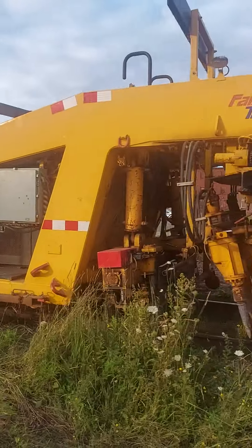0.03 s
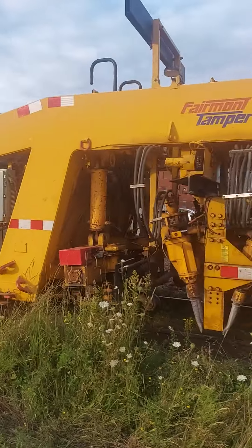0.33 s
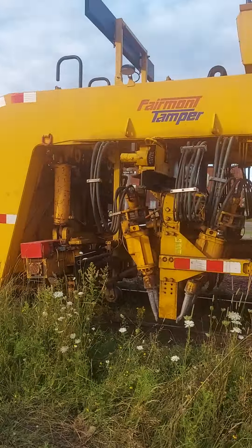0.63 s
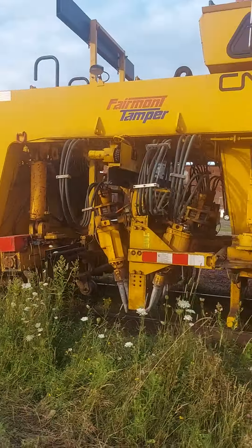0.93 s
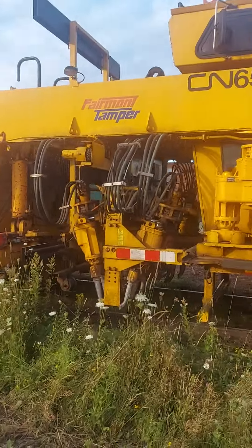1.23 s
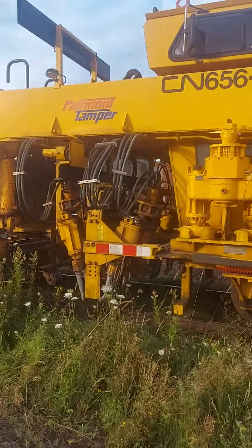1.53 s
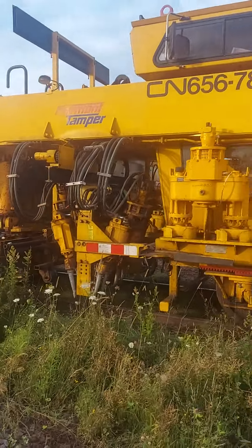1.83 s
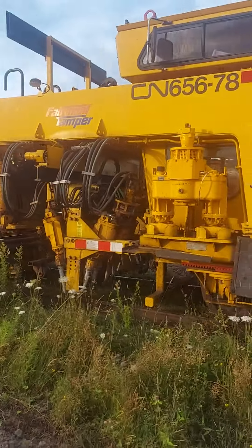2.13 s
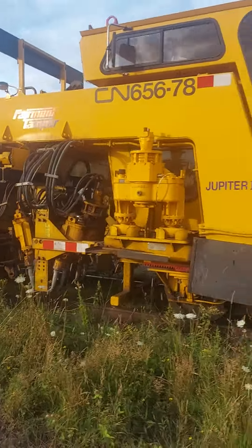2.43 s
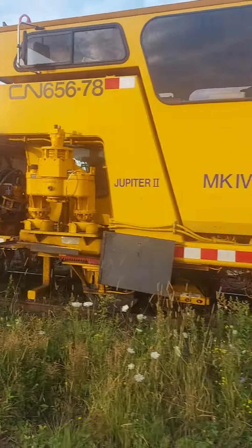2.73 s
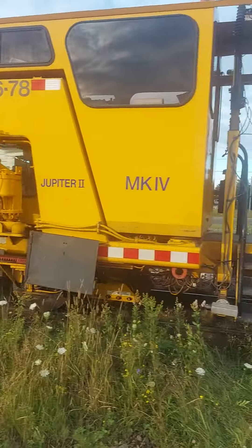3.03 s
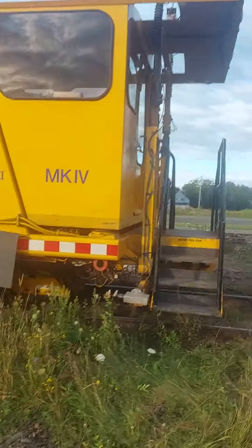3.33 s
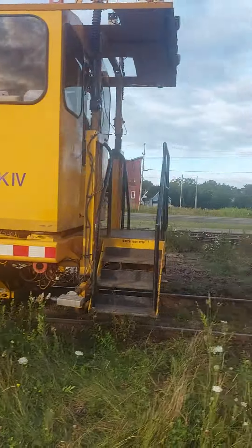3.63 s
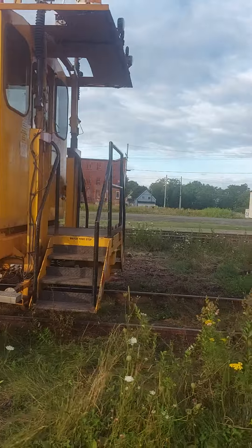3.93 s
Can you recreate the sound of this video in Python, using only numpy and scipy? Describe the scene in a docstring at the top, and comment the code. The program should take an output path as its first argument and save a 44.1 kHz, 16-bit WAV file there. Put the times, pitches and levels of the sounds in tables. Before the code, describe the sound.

Low wind rumble buffets a muffled handheld microphone outdoors. Dull handling knocks and soft footsteps in grass come through over a faint distant wash and hum, and one strong gust thumps near the end.

```python
"""First comes a low rumble of air on a camera's two muffled microphone ports, over a far wash, a hum
and faint hiss. Dull handling knocks ring briefly in the case as someone carries it through grass,
past a silent, parked rail machine. The soft footsteps and the distance reach mostly the left port.
Moving air rumbles and thumps on each port by itself, with one strong gust near the end."""
import sys
import numpy as np
from scipy.fft import rfft, irfft, next_fast_len
from scipy.io import wavfile
from scipy.ndimage import map_coordinates

SR = 44100
rng = np.random.default_rng(int(sys.argv[2]) if len(sys.argv) > 2 else 0)


def wav_out(sig):
    """Save sig, one row per channel (or a flat mono array), as 16-bit PCM at SR to the path in sys.argv[1]."""
    wavfile.write(sys.argv[1], SR, np.round(np.clip(np.atleast_2d(sig).T, -1, 1) * 32767).astype(np.int16))


N = 176400


def amp(db):
    """Decibels to gain."""
    return 10 ** (np.asarray(db) / 20)


def unit(x):
    """Scale to rms 1."""
    return x / np.sqrt(np.mean(x ** 2) + 1e-20)


def noise():
    """White noise."""
    return rng.standard_normal(N)


def curve(rows):
    """(t/s, value) points as one value per sample."""
    return np.interp(np.arange(N) / SR, *np.transpose(rows))


def wobble(rate):
    """A smooth random curve, rate knots a second."""
    return map_coordinates(rng.standard_normal(int(N * rate / SR) + 4), [np.arange(N) * rate / SR])


def swell(centre, half_s):
    """A bell-shaped rise and fall."""
    return np.exp(-((np.arange(N) / SR - centre) / half_s) ** 2)


def bursts(rows, t60_s, rise_s=0.002):
    """Envelope of (t/s, level/dB) events that rise quickly and die away."""
    ages = [(np.maximum(np.arange(N) / SR - t, 0), db) for t, db in rows]
    return sum((1 - np.exp(-(age / rise_s) ** 2)) * amp(db - 60 * age / t60_s) for age, db in ages)


def filtered(x, response):
    """x through a complex response of frequency."""
    size = next_fast_len(N + 8192)
    return irfft(rfft(x, size) * response(np.fft.rfftfreq(size, 1 / SR)), size)[..., :N]


def coloured(x, spectrum):
    """x shaped by (f/Hz, relative level/dB) points, at rms 1."""
    hz, db = np.transpose(spectrum)
    return unit(filtered(x, lambda f: amp(np.interp(np.log(f + 1), np.log(hz), db))))


def lowpass(f, edge_hz):
    """Response of a causal third-order low-pass."""
    s = 1j * f / edge_hz
    return 1 / ((1 + s) * (1 + s + s * s))


def ring(f, modes, alternate):
    """Response of damped modes, in like or alternating polarity."""
    return sum((-1) ** (k * alternate) * amp(db) * 1j * f * width / (hz * hz - f * f + 1j * f * width)
               for k, (hz, width, db) in enumerate(modes))


# Air flow right on each microphone port: t/s, level/dB
FLOW_LEFT = [(0.0, -46), (0.62, -52), (0.76, -55), (0.88, -49), (0.94, -51.3), (1.46, -47), (1.48, -42.5),
             (1.74, -52.5), (1.8, -49), (2.02, -53.5), (2.12, -47.5), (2.32, -52), (2.44, -51),
             (2.6, -41.5), (2.78, -41.5), (2.84, -44.5), (3.04, -55), (3.06, -39), (3.26, -24.5),
             (3.36, -24.5), (3.42, -39.5), (3.52, -35.5), (3.56, -50.5), (3.68, -40), (3.76, -48.5),
             (4.0, -42)]
FLOW_RIGHT = [(0.0, -82), (0.02, -55), (0.36, -66), (0.57, -53.5), (0.72, -73), (1.34, -54.5),
              (1.46, -63.8), (2.0, -59), (2.16, -65.3), (2.34, -49.5), (2.42, -67.5), (2.64, -47),
              (2.7, -59), (2.9, -42), (2.98, -76), (3.18, -65.5), (3.32, -48), (3.44, -39), (3.56, -66),
              (4.0, -58.5)]
# Colour of the breeze on each port, and of a gust: f/Hz, relative level/dB
BREEZE_LEFT = [(20, -23.5), (32, -16), (45, -4.5), (65, 2.5), (95, -1), (135, -2), (170, -11), (225, -15),
               (290, -18.5), (370, -30.5), (480, -54.5), (2000, -100)]
BREEZE_RIGHT = [(20, -11), (32, -5.5), (55, 4.5), (80, 0.5), (130, -7), (220, -25.5), (310, -26.5),
                (450, -38.5), (1500, -69)]
GUST = [(20, -38), (32, -28), (50, -18), (90, 5.5), (160, 0), (250, -8.5), (340, -17), (430, -45),
        (1500, -100)]


def air_rumble(flow, breeze, lumps_db, gust_onset_db=-37, gust_range_db=22):
    """Moving air buffets one port: a lumpy rumble, brighter in a strong gust."""
    flow_db, eddies = curve(flow), noise()
    gust = np.clip((flow_db - gust_onset_db) / gust_range_db, 0, 1)
    rumble = (1 - gust) * coloured(eddies, breeze) + gust * coloured(eddies, GUST)
    return amp(flow_db) * unit(rumble * amp(lumps_db * wobble(21.715)))


# Wash from far off, at the left port: t/s, low band level/dB, high band level/dB
WASH = [(0, -65, -67), (.25, -70, -72.5), (.65, -64.5, -65), (.95, -70.5, -76), (1.35, -63, -78.5),
        (1.85, -67.5, -76.5), (2.1, -64.5, -74.5), (2.4, -63, -66.5), (3.2, -62, -61.5), (3.55, -58.5, -66),
        (3.75, -65.5, -69), (4, -65, -68)]
# Colour of its two bands: f/Hz, relative level/dB
WASH_LOW = [(100, -11), (280, 2), (470, 1), (760, -0.5), (950, -12), (1300, -19), (2000, -36.5),
            (4000, -66.5)]
WASH_HIGH = [(400, -21), (800, -6), (1000, -1.5), (1200, -2), (1420, -10), (1700, -19.5), (2200, -31.5),
             (4000, -62)]


def far_wash():
    """A hollow wash, like far traffic: two bands of noise swell and fade."""
    t, low_db, high_db = np.transpose(WASH)
    low = amp(curve(np.c_[t, low_db])) * coloured(noise(), WASH_LOW)
    high = amp(curve(np.c_[t, high_db])) * coloured(noise(), WASH_HIGH)
    return low + high


# Distant engine, at the left port: f/Hz, level/dB, loudest at t/s, half length/s
HUM = [(64.7, -60.5, 0.72, 4.6), (121.3, -60.5, 1.3, 2), (176.3, -62, 1.9, 0.46),
       (194.7, -58.5, 0.035, 0.67), (225, -61, 1.4, 0.33), (230.3, -67, 2.1, 0.99)]


def engine_hum(waver=0.0093):
    """A distant engine hums in low tones, each wavering in pitch and swelling by itself."""
    hum = np.zeros(N)
    for hz, db, centre, half_s in HUM:
        pitch_hz = hz * (1 + waver * wobble(8.7))
        tone = np.sqrt(2) * np.sin(2 * np.pi * np.cumsum(pitch_hz) / SR)
        hum += amp(db) * swell(centre, half_s) * tone
    return hum


# Noise floor of the microphones, ahead of each side's gain: t/s, level/dB
HISS = [(0.0, -79.5), (0.14, -82.5), (2.49, -82.5), (2.65, -80.5), (2.99, -82.5), (3.31, -78.5),
        (3.66, -83), (4.0, -81.5)]
# Its colour in each microphone: f/Hz, relative level/dB
HISS_LEFT = [(100, -6), (2000, -5), (3000, -9.5), (4200, -11), (6500, -15.5), (9000, -10.5), (11000, -1.5),
             (13500, -0.5), (15700, -5)]
HISS_RIGHT = [(100, 11), (700, 4.5), (1500, 0), (3000, -4), (4200, -3.5), (6800, -9), (9000, -5),
              (11000, 1), (13500, 1), (15700, -7.5)]


def microphone_hiss(left_db=6.5, right_db=3):
    """Each microphone adds its own faint hiss."""
    left = amp(left_db) * coloured(noise(), HISS_LEFT)
    right = amp(right_db) * coloured(noise(), HISS_RIGHT)
    return amp(curve(HISS)) * np.array([left, right])


# Case modes at each port: f/Hz, width/Hz, relative level/dB
CASE_LEFT = [(347, 135, 17), (659.4, 236, 31.5), (1042, 213, 35.5)]
CASE_RIGHT = [(104, 79, 3.3), (338.3, 78, 16.9), (783, 280, 5), (1037, 520, 1)]
# Handling knocks on the case, right at the microphones: t/s, relative level/dB
KNOCKS = [(0.0544, -15), (1.2046, 0), (1.7534, -3.6), (2.3199, -1), (2.499, -17), (2.792, -13),
          (2.9184, -6), (3.3539, 3.5), (3.677, -17.5), (3.9669, -18)]


def case_knocks(click_db=-38):
    """Each knock pushes the case once, with a faint contact click; the ports hear different modes."""
    blows = np.zeros(N)
    for t, db in KNOCKS:
        blows[round(t * SR)] = -amp(db)
    # The case passes little treble.
    left = filtered(blows, lambda f: ring(f, CASE_LEFT, alternate=True) * lowpass(f, edge_hz=332.4))
    right = filtered(blows, lambda f: ring(f, CASE_RIGHT, alternate=False) * lowpass(f, edge_hz=547))
    click = amp(click_db) * filtered(blows, lambda f: lowpass(f, edge_hz=2780) ** 2)
    return np.array([left + click, right + click])


# After-sound of a knock, at both ports: f/Hz, relative level/dB
TAIL_COLOUR = [(200, -10), (350, -2), (600, -3), (1150, -0.5), (1700, -6), (2500, -15.5), (6000, -48)]


def knock_tails(gain_db=-66, right_db=-7):
    """A faint, diffuse after-sound follows each knock."""
    left = coloured(noise(), TAIL_COLOUR)
    right = amp(right_db) * coloured(noise(), TAIL_COLOUR)
    return amp(gain_db) * bursts(KNOCKS, t60_s=0.36) * np.array([left, right])


# Eddies straight onto the ports: t/s, f/Hz, left peak level/dB, right peak level/dB
THUMPS = [(.465, 112, -37.5, -66), (0.544, 81.4, -44, -44.5), (.885, 80, -38, -73),
          (1.048, 68.6, -35.5, -74), (1.244, 77, -43.5, -35), (1.333, 131, -66, -49), (1.52, 131, -34, -65),
          (2.631, 121, -35, -40), (2.663, 82, -28.5, -62), (3.095, 152, -22.5, -65), (3.092, 270, -29, -70),
          (3.137, 180, -28, -70.5), (3.259, 100, -16, -60), (3.272, 210, -19, -66), (3.306, 310, -19, -61),
          (3.335, 118.7, -16, -50), (3.511, 81, -24.5, -60)]


def air_thumps(half_cycles=0.93):
    """Single eddies hit the ports as low pushes of a cycle or two."""
    ports = np.zeros((2, N))
    for t, hz, left_db, right_db in THUMPS:
        cycles = (np.arange(N) / SR - t) * hz
        push = np.cos(2 * np.pi * cycles) * np.exp(-(cycles / half_cycles) ** 2)
        ports += amp([[left_db], [right_db]]) * push
    return ports


# Steps in the grass below the camera: t/s, tread level/dB, swish level/dB, swish lag/s
STEPS = [(0.483, -52.5, -72.5, 0.044), (1.05, -58.5, -83, 0.013), (1.606, -55.5, -77.5, 0.019),
         (2.172, -56.5, -83, 0.042), (2.744, -55, -69, 0.016), (3.306, -47.5, -76.5, 0.012),
         (3.897, -52.5, -72.5, 0.011)]
# Small scuffs underfoot: t/s, tread level/dB, swish level/dB
SCUFFS = [(0.477, -57, -85), (1.927, -51, -90), (2.148, -68, -90), (2.74, -51, -54.5), (3.217, -44, -74),
          (3.320, -43.5, -70.5), (3.876, -54, -71), (3.898, -53, -81)]
# Nearby grass rustling between steps: t/s, level/dB
RUSTLE = [(0, -86), (.6, -89), (.9, -92.5), (2.1, -87.5), (2.45, -84.5), (2.75, -70.5), (3.0, -76),
          (3.3, -73.5), (3.65, -85), (4, -84)]
# Tread and swish through the muffled ports: f/Hz, relative level/dB
TREAD_COLOUR = [(100, -22), (250, 2.5), (420, 0.5), (750, -5), (1100, -10.5), (1450, -22), (2000, -46),
                (4000, -66)]
SWISH_COLOUR = [(500, -18), (1100, -2), (1600, 4), (2100, -3.5), (2550, -12.5), (3200, -22), (4200, -22),
                (5500, -44), (12000, -72)]


def footsteps(grain_db=5, scuff_t60_s=0.069):
    """Each step is a soft, grainy tread and a swish of grass; a few scuffs stand out."""
    tread = bursts([(t, db) for t, db, _ in SCUFFS], scuff_t60_s)
    swish = bursts([(t, db) for t, _, db in SCUFFS], scuff_t60_s) + amp(curve(RUSTLE))
    for t, tread_db, swish_db, lag in STEPS:
        tread += amp(tread_db) * swell(t, half_s=0.042)
        swish += amp(swish_db) * swell(t + lag, half_s=0.055)
    crunch = lambda: noise() * amp(grain_db * wobble(250))
    return tread * coloured(crunch(), TREAD_COLOUR) + swish * coloured(crunch(), SWISH_COLOUR)


# Stems close by, at leg height: t/s, level/dB
STEMS = [(.657, -78), (1.832, -73.5), (2.768, -71), (3.298, -81)]
# Colour of their ticks: f/Hz, relative level/dB
STEM_COLOUR = [(2000, -34), (3200, -6), (3900, 0), (4600, -10), (7000, -35)]


def stem_ticks():
    """Single grass stems strike the legs with short, thin ticks."""
    return bursts(STEMS, t60_s=0.035) * coloured(noise(), STEM_COLOUR)


def scene(right_port_db=-36):
    """Everything at the two microphones; the right one hardly hears the surroundings."""
    air = np.array([air_rumble(FLOW_LEFT, BREEZE_LEFT, lumps_db=1),
                    air_rumble(FLOW_RIGHT, BREEZE_RIGHT, lumps_db=-0.5)])
    surroundings = (footsteps() + stem_ticks() + far_wash() + engine_hum()) * amp([[0], [right_port_db]])
    return air + air_thumps() + case_knocks() + knock_tails() + surroundings + microphone_hiss()


def record(dry, top_hz=15750):
    """The camera keeps nothing above its band limit."""
    return filtered(dry, lambda f: f < top_hz)


dry = scene()
out = record(dry)
wav_out(out)
```